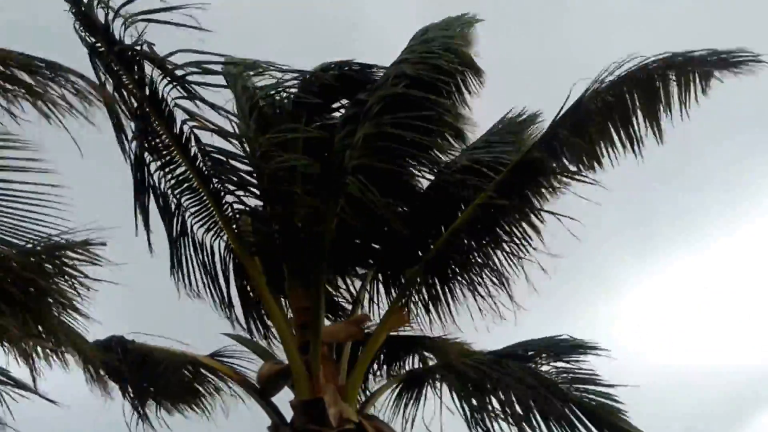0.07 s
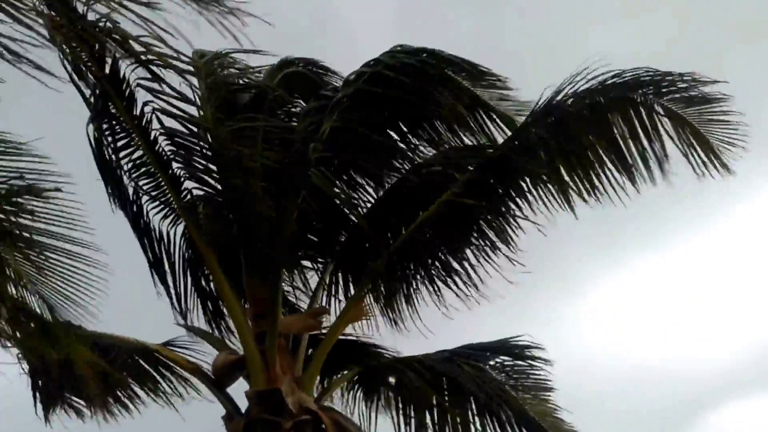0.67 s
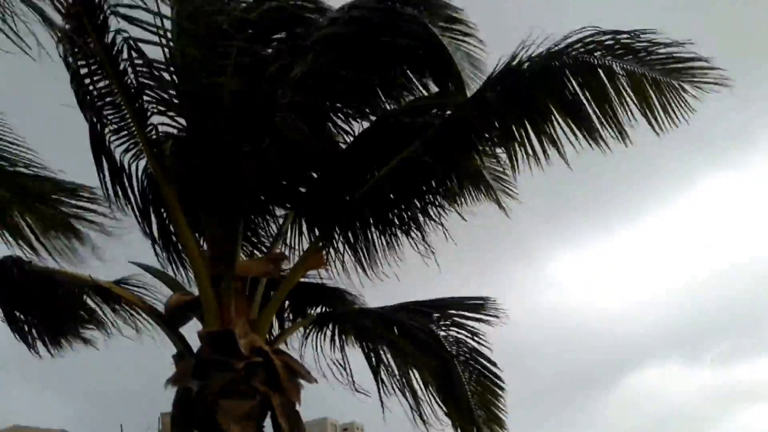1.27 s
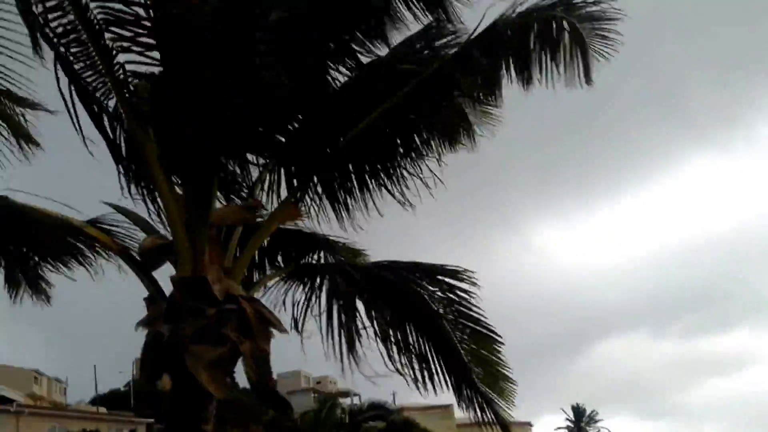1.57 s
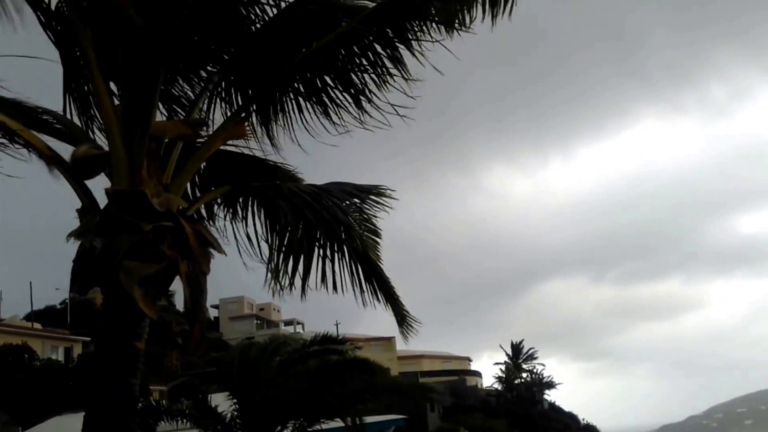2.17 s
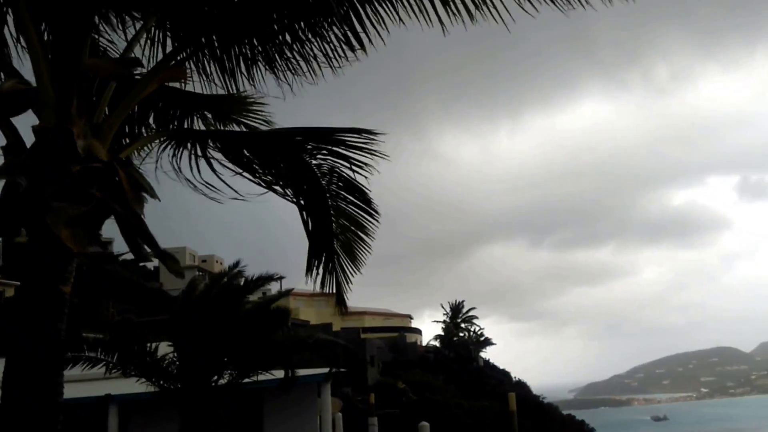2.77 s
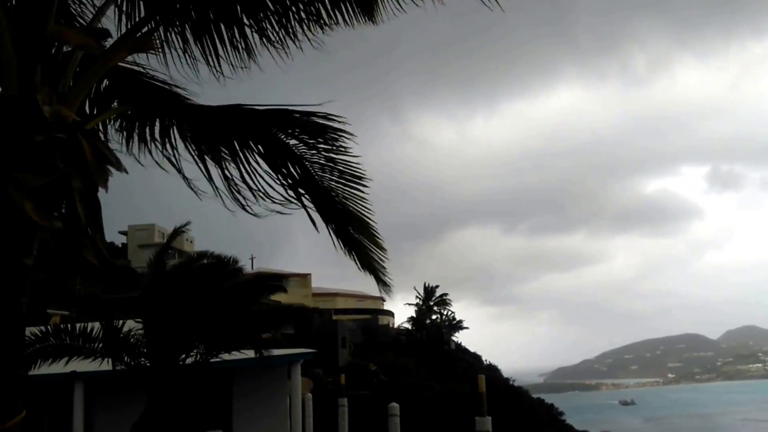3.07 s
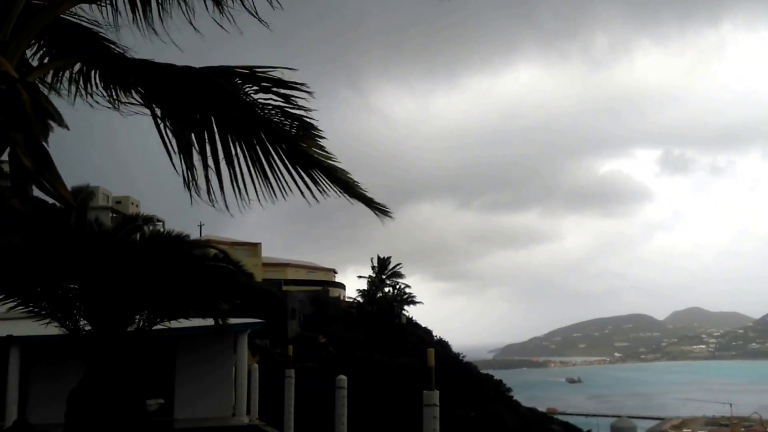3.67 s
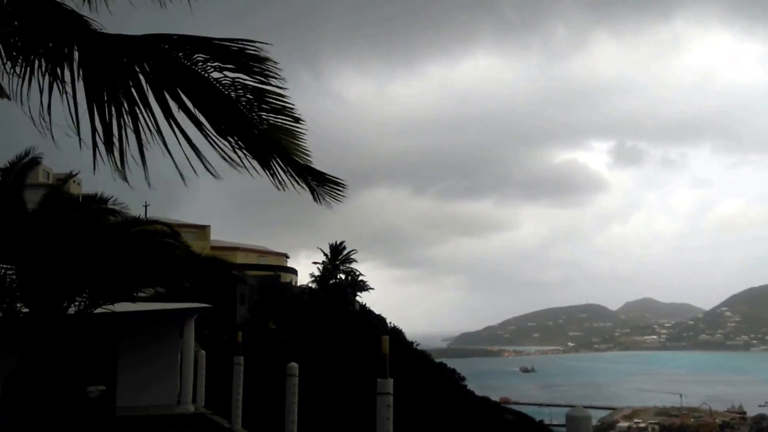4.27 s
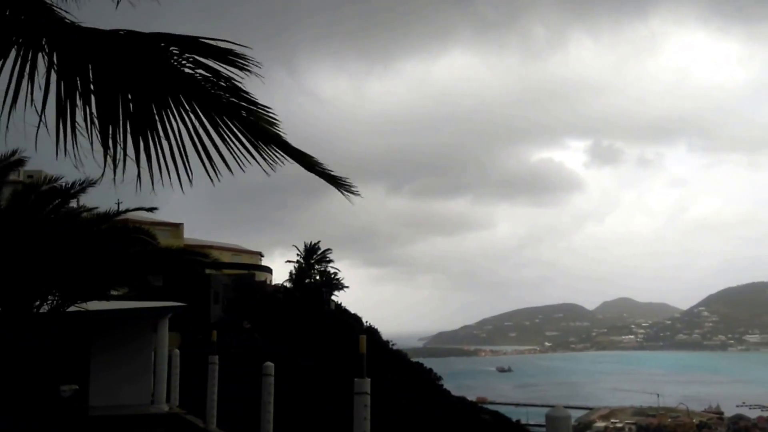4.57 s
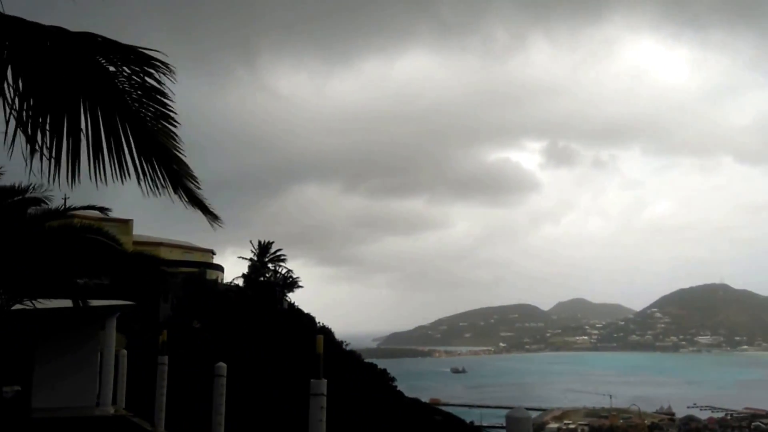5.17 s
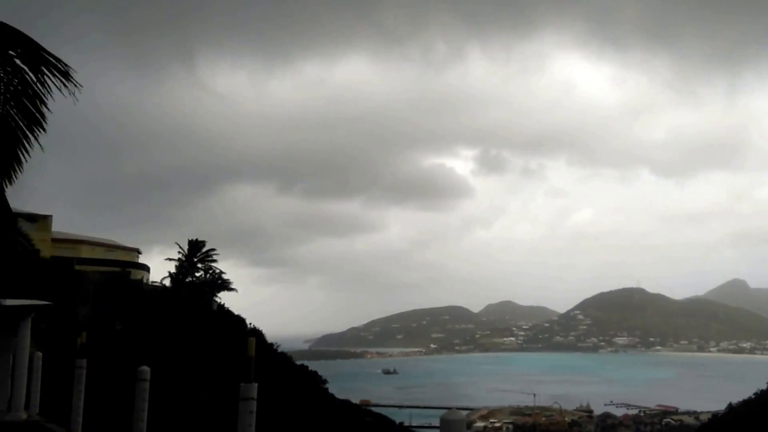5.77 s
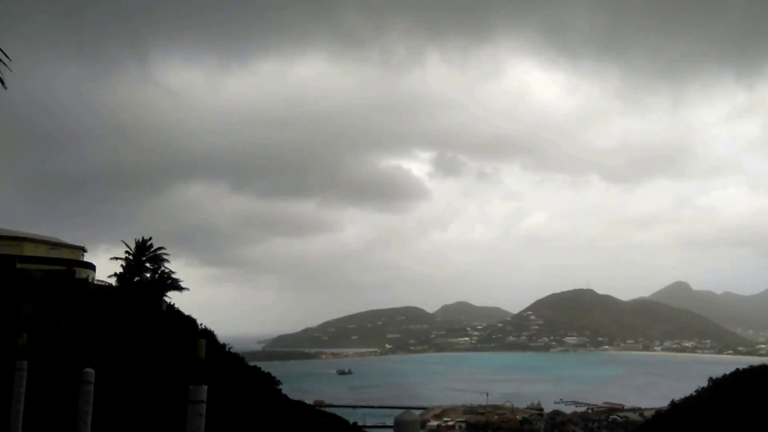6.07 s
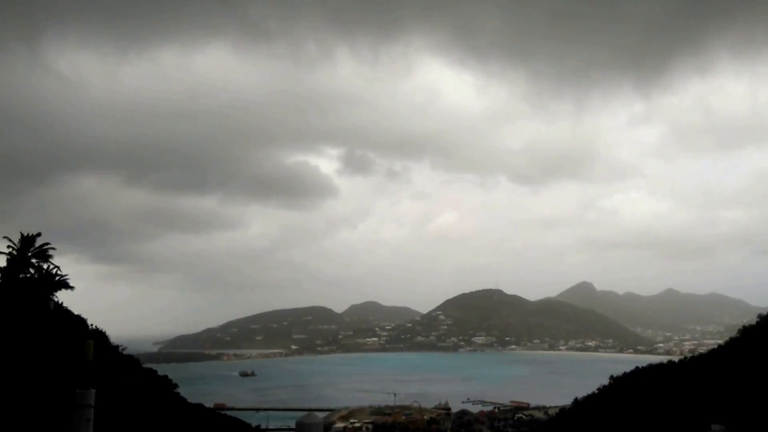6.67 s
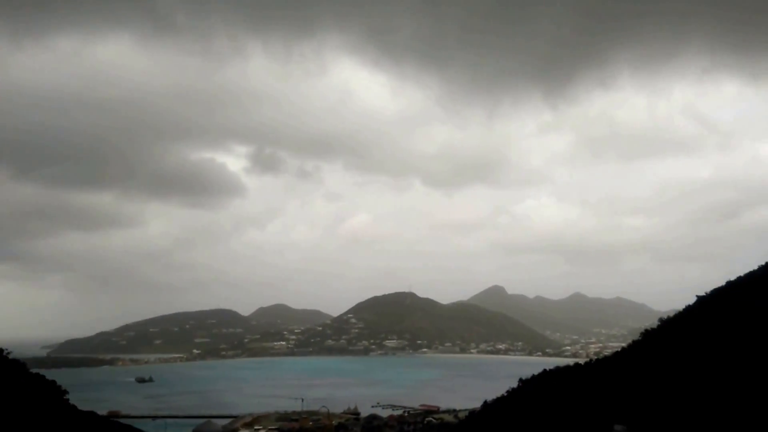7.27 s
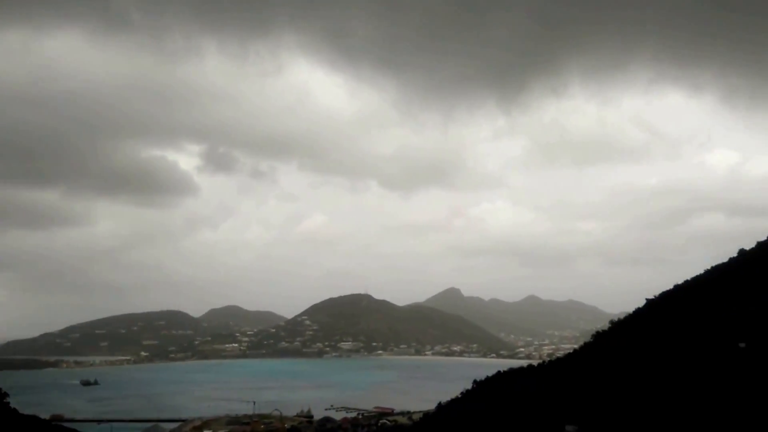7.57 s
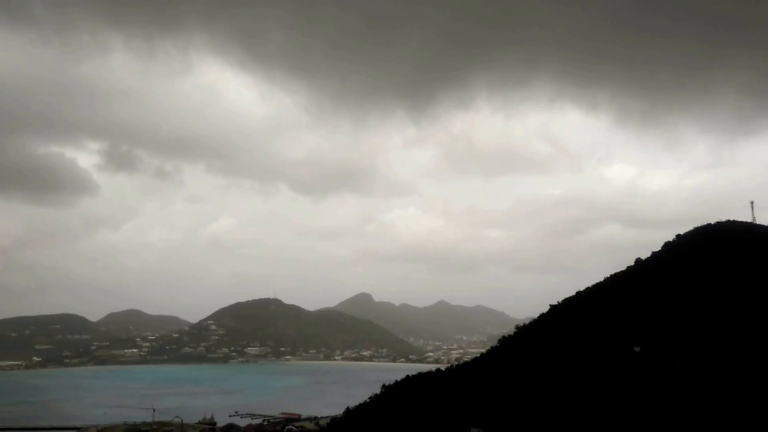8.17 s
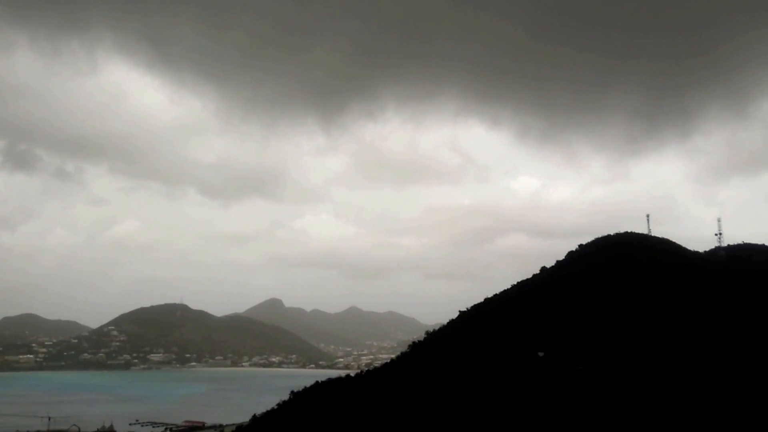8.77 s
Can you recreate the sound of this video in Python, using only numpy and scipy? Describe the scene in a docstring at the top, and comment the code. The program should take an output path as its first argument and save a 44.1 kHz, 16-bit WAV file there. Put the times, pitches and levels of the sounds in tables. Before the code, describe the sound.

Palm fronds rustle close by as irregular gusts thump and rumble against an outdoor microphone in a tropical storm. After a couple of seconds the wind hits hardest, tearing harshly across the microphone, mostly on the left. It then eases into scattered puffs and the rustle grows fainter, leaving the smooth roar of wind in far trees, until the buffeting returns at the close.

```python
"""A tropical storm on a hillside above a bay. From the start, gusts sweep eddies (swirls of air) over
two microphone ports, the left one facing the wind, while palm fronds thrash and hiss nearby. From about
2.4 to 4.4 s a big blast rasps over the ports and drives the recorder into its limiter; midway, a leaflet
cracks. Then the wind comes in weaker fits and the fronds fade as the microphone turns away, until gusts
pick up again near 8.4 s. Behind it all, the storm roars steadily in distant trees."""
import sys
import numpy as np
from scipy import signal
from scipy.fft import rfft, irfft, next_fast_len
from scipy.io import wavfile
from scipy.ndimage import uniform_filter1d, minimum_filter1d, map_coordinates

SR = 44100
rng = np.random.default_rng(int(sys.argv[2]) if len(sys.argv) > 2 else 0)


def dump(signal):
    """Clip the signal to [-1, 1] and save it as 16-bit WAV at the path in sys.argv[1]."""
    limited = np.clip(np.atleast_2d(signal).T, -1, 1)
    pcm = np.round(limited * 32767).astype(np.int16)
    wavfile.write(sys.argv[1], SR, pcm)


N = 388521
TIME = np.arange(N) / SR
MODERATE_DB = -20   # strength of a moderate wind

# The wind under the gusts. Each row: time in seconds, strength in dB at the left port, then the right.
WIND = [(0, -27.5, -23.5), (0.7, -26, -24.5), (0.82, -33, -25), (0.95, -23.5, -24), (1.1, -23.5, -26),
        (1.2, -39, -35), (1.4, -25, -23.5), (2.05, -21.5, -22), (2.2, -33, -21.5), (2.45, -18.5, -19.5),
        (2.9, -18, -19.5), (3.14, -28, -20), (3.3, -25, -18.5), (4.1, -22, -19), (4.48, -22, -27),
        (4.75, -39, -34), (5.1, -44, -38.5), (5.3, -35, -38), (5.8, -44, -39), (6.15, -35, -28),
        (6.8, -52.5, -47.5), (7.3, -29, -25.5), (7.8, -38, -42), (8.28, -39.5, -41), (8.45, -28.5, -24.5),
        (8.81, -35.5, -28)]
# Gusts break over a port, hold and let go.
# Each row: start in seconds, length in seconds, strength in dB, port (0 left, 1 right).
GUSTS = [(0, 0.069, -12, 0), (.135, 0.22, -12.5, 0), (.4, 0.063, -18, 1), (.411, 0.029, -11, 0),
         (0.494, 0.059, -15.5, 0), (.628, .052, -12.8, 0), (0.641, 0.062, -14, 1), (.722, 0.025, -12.5, 0),
         (0.891, .04, -21, 0), (0.916, .06, -21.5, 1), (1.12, 0.026, -14.5, 0), (1.246, 0.023, -10.5, 0),
         (1.355, 0.37, -14.5, 0), (1.371, 0.087, -15.5, 1), (1.471, 0.16, -13.5, 0), (1.502, .048, -6, 0),
         (1.564, 0.18, -14.5, 1), (1.754, 0.076, -20, 0), (1.86, .04, -14.5, 0), (1.919, .11, -13, 0),
         (2.16, 0.099, -19.5, 1), (2.322, .03, -12.5, 0), (2.387, 0.23, -10.5, 0), (2.396, .022, -2.5, 0),
         (2.624, .17, -14.5, 1), (2.684, 0.071, -11, 0), (2.791, 0.1, -11.5, 0), (2.823, 0.041, -4.5, 0),
         (2.924, 0.069, -18, 1), (3.025, 0.076, -13, 0), (3.172, 0.19, -11, 0), (3.23, .24, -15.5, 1),
         (3.399, 0.058, -9.5, 0), (3.492, 0.056, -9, 0), (3.572, 0.1, -8.5, 0), (3.595, 0.25, -13, 1),
         (3.709, 0.048, -9, 0), (3.773, .16, -11, 0), (3.822, .055, -8.5, 0), (3.867, .22, -17.5, 1),
         (3.954, 0.13, -8.5, 0), (4.101, 0.15, -8, 0), (4.13, .058, -6, 0), (4.17, .015, -0.5, 0),
         (4.258, .042, -7, 0), (4.26, .09, -17, 1), (4.313, 0.059, -4.5, 0), (4.405, 0.066, -13, 0),
         (4.612, 0.029, -16, 0), (4.675, 0.028, -18, 0), (4.815, 0.029, -21, 0), (4.859, .048, -12.5, 0),
         (5.14, 0.013, -11.5, 0), (5.182, 0.017, -11, 0), (5.408, .07, -27, 1), (5.856, 0.041, -12, 0),
         (5.888, 0.05, -6.5, 0), (5.95, .17, -19.5, 0), (6.175, 0.17, -20.5, 0), (6.348, 0.099, -11.8, 0),
         (6.51, 0.14, -33, 0), (6.969, .093, -25.5, 1), (7.152, 0.19, -17, 0), (7.46, 0.053, -23, 0),
         (7.53, 0.058, -15.5, 0), (7.674, 0.046, -19.5, 0), (7.867, 0.12, -21, 0), (7.902, 0.034, -19, 0),
         (8.058, 0.043, -22.5, 0), (8.337, 0.041, -20.5, 0), (8.387, 0.053, -14, 0), (8.468, 0.08, -10, 0),
         (8.401, .23, -23.5, 1), (8.553, 0.089, -14, 0), (8.747, 0.057, -12, 0)]
# Single swirls slap a port. Each row: time in seconds, strength in dB, port (0 left, 1 right).
SLAPS = [(.072, -11.5, 1), (.14, -12, 0), (.154, -9, 0), (.292, -11.5, 0), (.331, -11, 0), (.453, -7.8, 0),
         (.607, -15, 0), (0.652, -7.5, 0), (1.03, -11, 0), (1.067, -14, 1), (1.293, -11.5, 1),
         (1.296, -15.5, 0), (1.449, -10, 0), (1.652, -10.5, 0), (1.982, -9, 0), (2.102, -15.5, 0),
         (2.334, -12.5, 1), (2.379, -10, 1), (2.412, 1.5, 0), (2.441, -9.5, 1), (2.464, -4, 0),
         (2.545, -9, 0), (2.628, -9, 1), (2.798, -2.5, 0), (2.83, -8, 1), (3.206, -4.5, 0), (3.252, -8, 1),
         (3.33, -8, 1), (3.374, -6.5, 1), (3.403, -9, 0), (3.653, -5, 0), (3.712, -2, 1), (3.78, -5.5, 0),
         (3.829, -6, 0), (3.865, -6, 0), (3.898, -7.5, 0), (3.958, -8, 0), (4.005, -7, 0), (4.114, -6, 0),
         (4.179, 2, 0), (4.203, -6.5, 0), (4.223, -1.5, 0), (4.294, -2.5, 0), (4.387, -3.5, 0),
         (4.561, -14.5, 0), (4.667, -18, 1), (4.952, -22, 0), (5.001, -17, 0), (5.114, -22, 0),
         (5.188, -11.5, 0), (5.59, -24, 0), (6.003, -16.5, 0), (6.417, -9, 0), (6.483, -3.5, 0),
         (6.872, -25, 0), (6.94, -19.5, 0), (7.069, -22, 0), (7.158, -13.5, 0), (7.311, -14.5, 0),
         (7.409, -10.5, 0), (7.535, -10.5, 0), (8.157, -18.5, 0), (8.304, -22, 0), (8.472, -10.5, 0),
         (8.552, -9.5, 1)]

def flow_on(port, attack_s=.011, release_s=.022, bulge_db=1.5, slap_s=.0105, doubling_db=18):
    """Wind, gusts and slaps add up to the strength of the flow on one port, in dB."""
    power = from_db(in_time(WIND)[port]) ** 2
    for start, length, strength_db, side in GUSTS:
        if round(side) == port:
            near = slice(*np.searchsorted(TIME, [start - 2 * attack_s, start + length + 2 * release_s]))
            age = TIME[near] - start
            edges_db = 20 * (np.minimum(age, 0) / attack_s + np.minimum(length - age, 0) / release_s)
            swell_db = bulge_db * (.5 - np.clip(2 * age / length - 1, -1, 1) ** 2)
            power[near] += from_db(strength_db + edges_db + swell_db) ** 2
    for peak_s, strength_db, side in SLAPS:
        if round(side) == port:
            length = slap_s * 2 ** (-strength_db / doubling_db)   # weak ones drift by as soft puffs
            near = slice(*np.searchsorted(TIME, [peak_s - 2 * length, peak_s + 2 * length]))
            passage = 2 * (TIME[near] - peak_s) / length
            power[near] += from_db(strength_db) ** 2 / 2 ** (2 * passage ** 2)
    return 10 * np.log10(power)


# The tone of the eddies in a moderate wind. Each row: frequency in Hz, relative level in dB.
EDDY_SPECTRUM = [(40, -0.5), (150, 2.5), (270, 0.5), (400, -4), (600, -13), (1000, -29.5), (2000, -54),
                 (4000, -74), (10000, -107)]

def buffeting(flow_db, flutter_db, flutter_hz, calm_speed, gust_speed, port_hz, level_db,
              swirl_db=2.5, clump_db=4.0):
    """A fixed pattern of eddies sweeps over the port: faster flow sounds both louder and higher."""
    # light wind comes in fits, a full blast is steadier; the flow stalls more deeply than it surges
    fitful = .75 - .28 * np.tanh((flow_db + 8) / 4)
    strength_db = flow_db + flutter_db * fitful * capped(flutter(*flutter_hz), top=1.7)
    # the tight core of a swirl whips past faster still
    core_db = swirl_db * fitful * capped(flutter(40.9, 253.4), top=2.1)
    speed = calm_speed + gust_speed * from_db(.78 * (strength_db - MODERATE_DB) + core_db)
    # strong eddies come in clumps
    clumps = from_db(clump_db * np.concatenate([flutter(59, 196), flutter(48, 172)]))
    pattern = colour(rng.standard_normal(2 * N) * clumps, EDDY_SPECTRUM)
    pressure = sweep(pattern, speed) * from_db(strength_db + level_db)
    # eddies much larger than the port press on it only weakly
    return cut(pressure, "high", port_hz, order=2)


# The tone of tearing air in a hard blast. Each row: frequency in Hz, relative level in dB.
RASP_SPECTRUM = [(600, -3.5), (1200, 5), (2000, -3.5), (3000, -14), (4000, -25.5), (7000, -42),
                 (14000, -54)]

def rasp(flow_db, onset_db, softness_db, rough_db, level_db, blast_db=-4):
    """Hard blasts tear off the port's edge in ragged spits, which sound higher the harder it blows."""
    ragged_db = flow_db + rough_db * flutter(24.07, 141)
    torn_share = (1 + np.tanh((ragged_db - onset_db) / (2 * softness_db))) / 2
    speed = np.clip(from_db(.6 * (ragged_db - blast_db)), .5, 1.33)
    pattern = colour(rng.standard_normal(N), RASP_SPECTRUM)
    tearing = rms_one(sweep(pattern, speed))
    return tearing * torn_share * from_db(ragged_db + level_db)


# The tone of the churning air behind the housing. Each row: frequency in Hz, relative level in dB.
RUMBLE_SPECTRUM = [(20, -30), (35, -25), (50, -3.5), (68, -1), (100, -2.5), (160, -15), (300, -5.5),
                   (800, -60)]

def rumble(flow_db, level_db, growth, memory_s):
    """Air churns behind the whole housing: a deep rumble that follows the gusts sluggishly."""
    slow_db = uniform_filter1d(flow_db, int(memory_s * SR))
    wake = colour(rng.standard_normal(N), RUMBLE_SPECTRUM)
    return wake * from_db(level_db + growth * (slow_db - MODERATE_DB))


# Palm fronds, fading as the microphone turns away.
# Each row: time in seconds, level in dB, how much louder the left side is in dB.
FROND_LEVELS = [(0, -44, 5.5), (0.3, -46.5, 2), (0.65, -43.5, 2.5), (1.0, -43.5, 2), (1.1, -41, 1),
                (2.2, -41.5, 1), (2.95, -42, 1), (3.7, -42.5, -1.5), (4.45, -44.5, 2), (4.8, -49.5, 0.5),
                (5.6, -45.5, 1.5), (6.6, -50, -1), (7.6, -52, -8), (8.81, -53, -1)]
# A frond whips round with a swish. Each row: time in seconds, extra level in dB.
SWISHES = [(0.67, 2.5), (1.1, 1.5), (1.35, 1), (1.69, 3), (2.19, 2), (2.65, 2.5), (7.61, 3.5), (8.58, 5)]
# The basic tone of rustling leaves. Each row: frequency in Hz, relative level in dB.
LEAF_SPECTRUM = [(400, -20), (1500, 7.5), (2600, 8), (3900, 5.5), (4500, -0.5), (6500, 1), (9500, -3.5),
                 (12000, -9.5), (14500, -17)]

def fronds(ticks_per_s=2500, tick_share=0.81, swish_s=0.047, flap_db=1.35, flap_hz=16, tilt_db=4):
    """Leaflets rub in a smooth hiss and slap each other in ticks, more often as they thrash harder."""
    rustle_db, pan_db = in_time(FROND_LEVELS)
    rustle_db = rustle_db + sum(db / (1 + ((TIME - s) / swish_s) ** 4) for s, db in SWISHES)
    hits = rng.random((2, N)) < ticks_per_s * from_db(rustle_db - rustle_db.mean()) / SR
    size_db = 2.5 * np.minimum(rng.exponential(1, (2, N)), 5)
    ticks = rms_one(hits * from_db(size_db) * rng.choice([-1, 1], (2, N)))
    rustle = colour(rng.standard_normal((2, N)) + tick_share * ticks, LEAF_SPECTRUM)
    dull = cut(rustle, "low", 7000, order=1)
    brightened = dull * from_db(-tilt_db) + (rustle - dull) * from_db(tilt_db)
    return panned(brightened * from_db(rustle_db + flap_db * drift(flap_hz)), pan_db)


# A crack close by. Each row: start in seconds, level in dB.
LEAF_CRACKS = [(3.361, -26)]

def leaf_cracks(decay_s=0.0021, lowest_hz=5000):
    """A stiff leaflet cracks in a brief, bright burst of noise."""
    bursts = sum(from_db(db) * np.exp(-np.abs(TIME - s) / decay_s) * (TIME >= s) for s, db in LEAF_CRACKS)
    return cut(bursts * rng.standard_normal((2, N)) + 1e-18, "high", lowest_hz, order=2)


# Wind in far trees. Each row: time in seconds, level in dB, how much louder the left side is in dB.
TREE_LEVELS = [(0, -40, -7), (1.1, -37, -3), (2.3, -35.5, -0.5), (4.5, -37, 0), (5.6, -39, -2),
               (8, -39, 0.5), (8.8, -42, -2)]
# The tone of their roar. Each row: frequency in Hz, relative level in dB.
ROAR_SPECTRUM = [(60, -12), (200, 8), (500, 2.5), (1000, -1), (1500, -2.5), (2000, -2), (2700, -9.5),
                 (3700, -8.5), (4500, -18.5), (6000, -17), (14000, -47)]
# How alike left and right are. Each row: frequency in Hz, likeness (1 the same, -1 opposite).
ROAR_LIKENESS = [(100, 0.9), (620, 0.57), (1350, -0.64), (2900, 0.22), (6000, -0.11)]

def distant_trees(sway_db=0.75, sway_hz=6):
    """Trees all round blend into a smooth roar, alike on both sides only in its low part."""
    roar_db, pan_db = in_time(TREE_LEVELS)
    size = next_fast_len(N)
    alike = np.clip(at_hz(ROAR_LIKENESS, np.arange(size // 2 + 1) * SR / size), -1, 1)
    mid, side = rfft(rng.standard_normal((2, size)))
    pair = irfft(np.sqrt(1 + alike) * mid + np.sqrt(1 - alike) * side * [[1], [-1]], size)[:, :N]
    return panned(colour(pair, ROAR_SPECTRUM) * from_db(roar_db + sway_db * drift(sway_hz)), pan_db)


def from_db(db):
    """Turn decibels into a volume factor."""
    return 10 ** (np.asarray(db) / 20)


def rms_one(x):
    """Scale a signal to an average (rms) size of 1."""
    return x / np.sqrt(np.mean(x ** 2) + 1e-20)


def in_time(rows):
    """Join a table's timed rows into one curve per column."""
    seconds, *columns = np.transpose(rows)
    return [np.interp(TIME, seconds, column) for column in columns]


def at_hz(points, hz):
    """Read a table between its frequencies, on a log scale."""
    known_hz, values = np.transpose(points)
    return np.interp(np.log(hz + 1), np.log(known_hz), values)


def colour(x, spectrum):
    """Give a noise the tone in a table, at an average size of 1."""
    size = next_fast_len(x.shape[-1])
    hz = np.arange(size // 2 + 1) * SR / size
    shaped = rfft(x, size) * from_db(at_hz(spectrum, hz))
    return rms_one(irfft(shaped, size)[..., :x.shape[-1]])


def cut(x, kind, hz, order):
    """Keep the "low" or the "high" part of a sound."""
    return signal.sosfilt(signal.butter(order, hz, kind, fs=SR, output="sos"), x)


def sweep(pattern, speed):
    """Play a looped pattern at a changing speed."""
    return map_coordinates(pattern, [np.cumsum(speed)], order=3, mode="wrap")


def flutter(low_hz, high_hz):
    """A quick random wobble between two rates, about 1 in size."""
    slowed = cut(rng.standard_normal(N), "low", high_hz, order=3)
    return rms_one(cut(slowed, "high", low_hz, order=2))


def drift(rate_hz, step=40):
    """A slow random wander, about 1 in size."""
    pole = np.exp(-2 * np.pi * rate_hz * step / SR)
    noise = rng.standard_normal(N // step + 2002)
    slow = signal.lfilter([1], [1, -2 * pole, pole * pole], noise)[2000:]
    return np.interp(np.arange(N) / step, np.arange(len(slow)), rms_one(slow))


def capped(x, top):
    """Rises level off towards a top; falls stay as they are."""
    return np.where(x > 0, top * np.tanh(x / top), x)


def panned(x, pan_db):
    """Share a sound between left and right."""
    return x * from_db(np.array([pan_db, -pan_db]) / 2)


def gain_control(x, threshold_db, release_db_per_s, attack_s, range_db):
    """The louder side turns both sides down by a few dB; the volume then recovers."""
    power = np.abs(uniform_filter1d(x ** 2, int(attack_s * SR))).max(axis=0)
    over_db = np.clip(10 * np.log10(power + 1e-12) - threshold_db, 0, range_db)
    recovery_db = release_db_per_s * TIME
    down_db = np.maximum.accumulate(over_db + recovery_db) - recovery_db
    return x * from_db(-uniform_filter1d(down_db, size=200))


def limiter(x, ceiling, hold_s):
    """Each side's peaks are pressed smoothly under a ceiling."""
    span = int(hold_s * SR)
    gain = minimum_filter1d(ceiling / np.maximum(np.abs(x), ceiling), 2 * span)
    return x * uniform_filter1d(uniform_filter1d(gain, span), span)


def scene():
    """Each port has its own wind noise; both hear the fronds and the trees."""
    left_db, right_db = flow_on(0), flow_on(1)
    left = buffeting(left_db, flutter_db=3.0, flutter_hz=(17.65, 90.5),
                     calm_speed=.6, gust_speed=.4, port_hz=153, level_db=1.65)
    right = buffeting(right_db, flutter_db=4.0, flutter_hz=(9.9, 59.74),
                      calm_speed=.62, gust_speed=.38, port_hz=107, level_db=1.05)
    left += rasp(left_db, onset_db=-5.0, softness_db=1.84, rough_db=2.5, level_db=-8.5)
    right += rasp(right_db, onset_db=-8.5, softness_db=1.0, rough_db=4.0, level_db=-13.5)
    left += rumble(left_db, level_db=-30, growth=0.49, memory_s=0.03)
    right += rumble(right_db, level_db=-24, growth=0.85, memory_s=0.065)
    return np.array([left, right]) + fronds() + leaf_cracks() + distant_trees()


def record(dry):
    """The hardest slaps overload the microphone; the recorder tames peaks and cuts the top treble."""
    overload, cutoff_hz = 2.05, 14400
    clipped = np.clip(dry, -overload, overload)
    held = gain_control(clipped, threshold_db=-10, release_db_per_s=107, attack_s=0.013, range_db=4.5)
    limited = limiter(held, ceiling=.72, hold_s=.0003)
    return signal.sosfilt(signal.ellip(12, .1, 90, cutoff_hz, fs=SR, output="sos"), limited)


dry = scene()
out = record(dry)
dump(out)
```